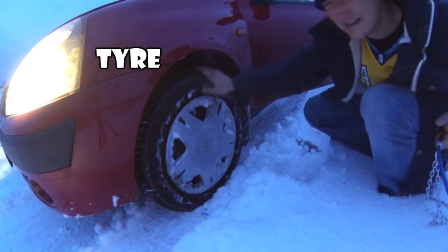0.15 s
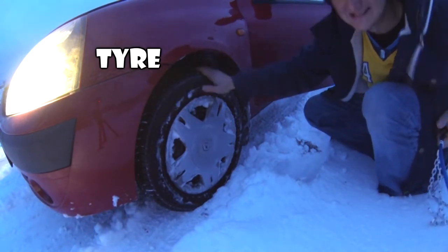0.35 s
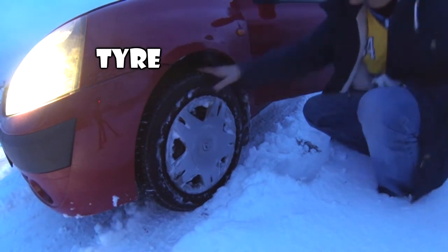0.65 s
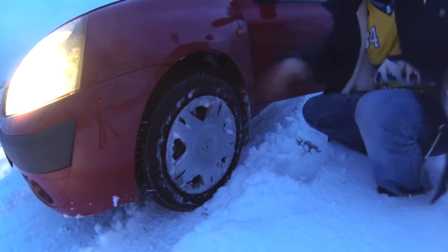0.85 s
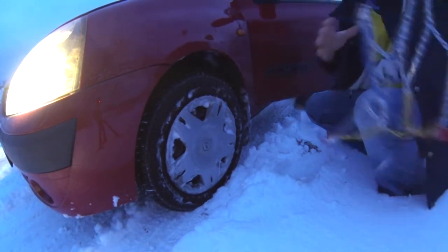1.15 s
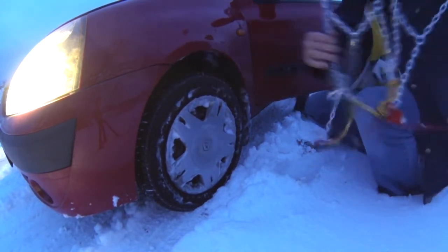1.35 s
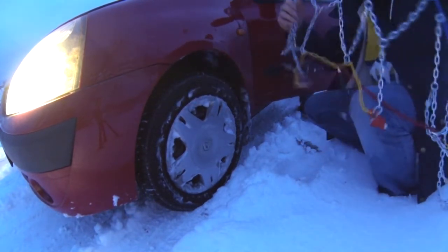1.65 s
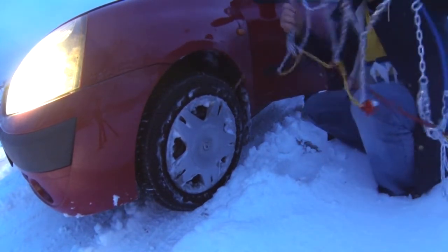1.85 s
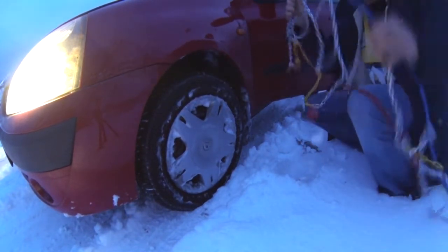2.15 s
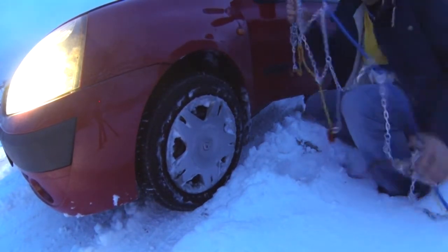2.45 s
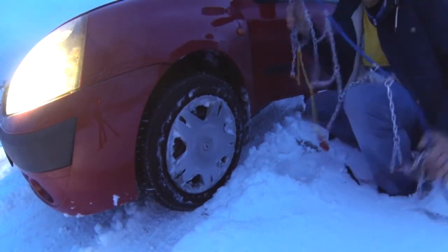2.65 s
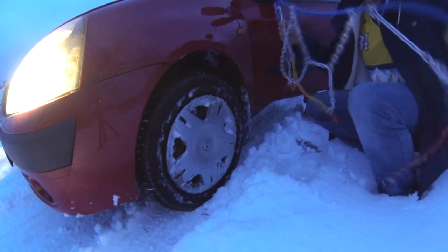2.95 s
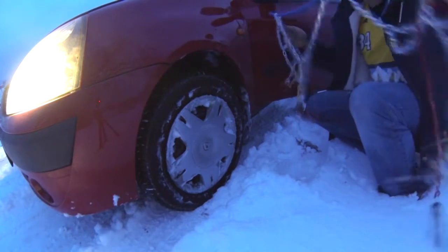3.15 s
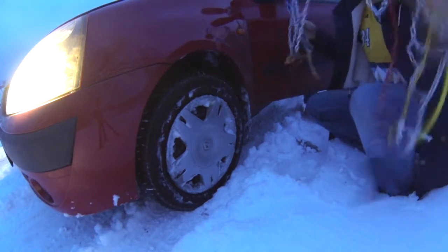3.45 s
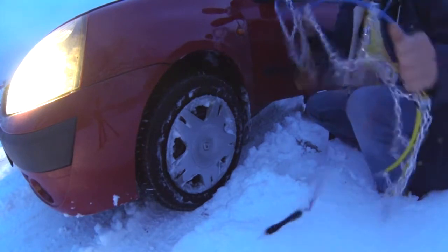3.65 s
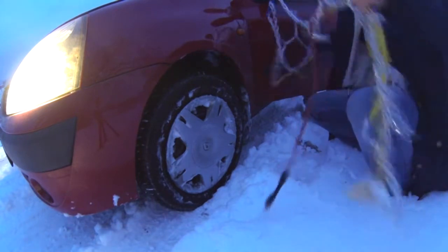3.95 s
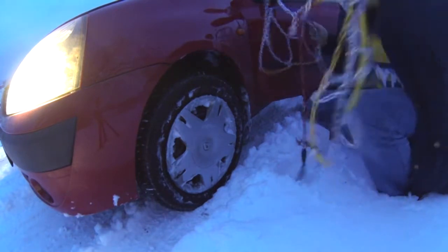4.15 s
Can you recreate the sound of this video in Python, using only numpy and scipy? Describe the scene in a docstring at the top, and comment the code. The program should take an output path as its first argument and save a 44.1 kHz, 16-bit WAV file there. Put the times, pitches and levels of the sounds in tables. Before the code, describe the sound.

Close, echo-free mono sound of someone untangling a metal snow chain in windy open air. Bassy buffeting never stops. After an early clack and a near chain-free second, links tick, clink and slide in uneven pulls, with dull snow and jacket crunches. A piercing snap momentarily pushes the level down, a dense jangle follows, then a hollow knock and sparser slides and ticks.

```python
"""Wind rumbles and buffets a microphone (shaped noise); a small hard clack follows, then single eddies slap.
A steel snow chain is lifted and untangled: snow and jacket cloth crunch, links slide (clumped grains).
Dead contacts tick (short resonated noise); loose links jingle and clink (decaying modes).
One hard clink close by makes the limiter duck everything for a moment."""
import sys
import numpy as np
from scipy import signal
from scipy.fft import rfft, irfft, next_fast_len
from scipy.io import wavfile
from scipy.ndimage import uniform_filter1d, minimum_filter1d, map_coordinates

SR = 44100
rng = np.random.default_rng(int(sys.argv[2]) if len(sys.argv) > 2 else 0)


def log_audio(samples):
    """Write samples as a 16-bit WAV file to the path given in sys.argv[1]."""
    # one column per channel
    frames = np.atleast_2d(samples).T
    # limit to full scale, then quantise
    limited = np.clip(frames, -1, 1)
    pcm = np.round(limited * 32767).astype(np.int16)
    wavfile.write(sys.argv[1], SR, pcm)


N = 190159

# wind strength over time: time_s, rumble_db, buffeting_db
WIND_LEVELS = [(0, -20.5, -17.5), (0.12, -25, -24), (0.23, -15.5, -19.5), (0.29, -19, -19),
               (0.37, -11.5, -17), (0.47, -15.5, -16), (0.62, -19, -21.5), (0.74, -13, -18.5),
               (0.83, -24, -20), (0.96, -17, -17), (1.13, -15.5, -20.5), (1.26, -17.5, -17.5),
               (1.42, -21, -20.5), (1.62, -20, -18), (1.78, -18.5, -21), (1.93, -24, -24),
               (1.99, -16.5, -17.5), (2.09, -18.5, -20.5), (2.2, -19.5, -19), (2.42, -19, -22.5),
               (2.55, -16, -18.5), (2.68, -13.5, -20), (2.87, -14, -20), (3.0, -21.5, -20),
               (3.1, -9, -18.5), (3.21, -17.5, -23), (3.42, -18.5, -17.5), (3.6, -18.5, -23),
               (3.84, -21, -23.5), (3.91, -19, -19.5), (4.08, -20, -20), (4.25, -14.5, -18.5),
               (4.31, -16.5, -23)]
# noise spectra of large eddies, small eddies and air hiss: freq_hz, relative_level_db
RUMBLE_SPECTRUM = [(10, -2), (27, 9), (40, 9), (62, 9.5), (100, 2), (160, -12.5), (300, -42), (900, -110)]
BUFFET_SPECTRUM = [(60, 2.5), (130, 3.5), (200, 2), (320, -5), (500, -11.5), (750, -20.5), (1200, -28.5),
                   (2000, -40), (4000, -47), (9000, -80), (16000, -103)]
AIR_SPECTRUM = [(300, -19), (2000, -19), (4200, -27.5), (8200, -26.5), (11000, -44), (15000, -64)]
# modes of a small hard clack: freq_hz, relative_level_db, t60_s
CLACK_MODES = [(1850, -0.5, 0.026), (2370, 2.5, 0.012), (2600, 7, 0.012), (2910, 1.5, 0.01),
               (4000, -9, 0.007), (5300, 3, 0.0086), (7400, -1, 0.011)]
# modes of two links snapping taut close by: freq_hz, relative_level_db, t60_s
SNAP_MODES = [(3160, -19, 0.01), (4200, -19.5, 0.016), (4700, -7.5, .008), (5000, -20.5, 0.031),
              (8060, -22, 0.013), (8860, 3.5, 0.0069), (9025, 0, 0.031), (9000, -2, 0.0077),
              (9700, -23, .012), (12000, -21, .017)]
# modes of something hollow, struck by the chain's end: freq_hz, relative_level_db, t60_s
KNOCK_MODES = [(1025, 16, 0.012), (1210, 0, 0.017), (1550, -1, 0.009), (1900, 2, 0.0093),
               (2520, -13, 0.0071), (2960, -3, 0.009), (3770, -25, 0.009), (4700, -19, 0.009)]
# single eddies hitting the microphone: start_s, peak_db, t60_s
PUFFS = [(0.154, -15.5, 0.021), (0.221, -9, 0.1), (0.293, -15, .025), (0.438, -12.5, 0.17),
         (0.683, -10.5, 0.075), (0.739, -15, 0.032), (0.794, -9.5, 0.076), (0.847, -11, 0.055),
         (1.0, -12.5, 0.071), (1.034, -14, 0.067), (1.229, -20, 0.14), (1.454, -15.5, 0.051),
         (1.755, -12.5, 0.066), (1.847, -13.5, 0.018), (1.99, -7, 0.11), (2.128, -13.5, 0.052),
         (2.53, -11.5, 0.058), (2.777, -9, .06), (2.89, -10.5, 0.088), (3.0557, -7, 0.044),
         (3.121, -9.5, 0.032), (3.946, -15.5, 0.018), (4.242, -6.5, 0.042)]
# noise spectrum of a slapping eddy: freq_hz, relative_level_db
EDDY_SPECTRUM = [(60, 4.5), (280, 7), (550, -5), (900, -17.5), (1500, -28), (4000, -47), (12000, -90)]
# pulls and shakes of the chain, levels before trims:
# start_s, length_s, crunch_db, sliding_db, jingle_db, shimmer_db
PULLS = [(0.2, 0.23, -60, -72, -80, -85), (0.424, 0.059, -55, -71, -72, -73),
         (0.553, 0.17, -42.5, -52, -52, -66), (0.744, 0.19, -49, -54, -62, -57),
         (0.962, 0.16, -46.5, -57, -58, -52), (1.176, 0.15, -46.5, -57, -51.5, -45),
         (1.3, 0.16, -62, -44.5, -61, -46), (1.5, 0.18, -50, -45.5, -59, -55),
         (1.835, 0.12, -41.5, -42.5, -47.5, -50), (2.065, 0.048, -43, -43.5, -47, -50),
         (2.199, 0.18, -43, -39.5, -38.5, -43), (2.366, 0.043, -42, -49, -45.5, -43),
         (2.497, 0.13, -50, -43.5, -42, -48), (2.705, 0.075, -43, -54, -56, -50),
         (2.865, 0.098, -38.5, -67, -54, -56), (3.066, 0.078, -45, -58, -58, -64),
         (3.212, 0.043, -37, -60, -66, -55), (3.333, 0.415, -41.5, -44, -49, -41),
         (3.464, 0.14, -37, -35.5, -37.5, -36.5), (3.79, 0.16, -50.5, -45, -52, -69),
         (4.11, 0.2, -71, -42.5, -65, -72)]
# spectra of snow and cloth, and of sliding links: freq_hz, relative_level_db
CRUNCH_SPECTRUM = [(300, -21), (1500, -1.5), (2500, -4.5), (4500, -7.5), (6600, -1), (8500, -4),
                   (11000, -11), (15000, -10.5)]
SLIDE_SPECTRUM = [(1500, -24), (4200, -2), (7100, -1.5), (8000, 7), (9000, 7.5), (10200, 0), (11200, -3.5),
                  (13300, 0.5), (15200, -10)]
# dead contacts of taut links and crusted snow, before dulling: start_s, peak_db, centre_hz, t60_s
TICKS = [(0.571, -25, 5400, 0.0078), (0.613, -28, 7000, .008), (0.685, -37, 9000, .007),
         (0.808, -22.5, 9100, 0.011), (0.967, -29, 6800, .015), (0.998, -23, 6200, 0.024),
         (1.073, -12.5, 9800, 0.0071), (1.083, -19, 9500, 0.0089), (1.438, -20, 8200, 0.012),
         (1.479, -23, 8100, 0.0049), (1.634, -24, 7000, 0.024), (1.716, -28.5, 7200, 0.029),
         (1.92, -23, 5160, 0.025), (2.074, -24.5, 6030, .014), (2.188, -23.5, 6270, 0.011),
         (2.222, -19, 8350, 0.014), (2.267, -24, 7500, .008), (2.555, -25, 6500, 0.0087),
         (2.653, -28, 7000, 0.012), (2.796, -23, 4380, 0.017), (2.825, -23.5, 6200, .008),
         (2.857, -21, 5840, 0.017), (2.891, -18, 6100, 0.014), (2.926, -12, 6100, 0.012),
         (2.945, -20, 7000, 0.0065), (2.969, -23.5, 5300, 0.0069), (3.199, -34, 5800, .012),
         (3.253, -18, 5600, 0.014), (3.309, -22.5, 5600, .012), (3.363, -21, 4700, 0.017),
         (3.373, -24, 4000, 0.009), (3.424, -30, 8000, .008), (3.442, -20, 7500, 0.034),
         (3.459, -22, 6640, .008), (3.476, -17, 11000, .02), (3.488, -10.5, 9800, 0.022),
         (3.536, -16, 10200, .012), (3.559, -13, 8850, 0.011), (3.569, -12, 7400, 0.011),
         (3.578, -4, 8700, 0.014), (3.646, -24, 11000, .01), (3.71, -18, 9500, .008),
         (3.7746, -15.5, 8450, 0.029), (3.804, -22, 9400, 0.011), (3.9286, -19, 4150, 0.0078),
         (3.949, -35, 9500, .004), (3.984, -23.5, 9500, 0.042), (4.076, -17, 7750, 0.019),
         (4.123, -30.5, 3150, 0.018), (4.16, -34, 9500, .014), (4.219, -25, 9300, 0.0092),
         (4.233, -24, 9200, 0.0097), (4.244, -30, 8560, 0.0079), (4.265, -33, 4970, 0.028),
         (4.302, -9, 8500, 0.017)]
# ringing modes of the links, scaled by each layer: freq_hz, relative_level_db, t60_s
LINK_MODES = [(4600, -15, 0.032), (4340, 7, 0.18), (4900, -19, 0.028), (4800, 9, 0.064),
              (5800, -14.5, 0.048), (7620, 12, 0.069), (8330, 16, 0.044), (8160, 24, 0.026),
              (8670, 10.5, 0.051), (9030, 4, 0.079), (9800, -6, 0.069), (10230, -2, 0.15), (11700, 5, .04),
              (12400, 15, 0.019), (14010, 1, 0.017), (14290, 6, 0.094), (15000, -10, 0.064),
              (15200, -24, 0.033)]
# modes of links hanging free: freq_hz, relative_level_db, t60_s
FREE_RING_MODES = [(7910, -9, .09), (9035, -6, .09), (10215, -6, .12)]
# highest link modes, kept going by light touches: freq_hz, relative_level_db, t60_s
SHIMMER_MODES = [(14150, 0.5, 0.022), (14700, -10, .015), (14900, -19, 0.023)]
# loose links striking: start_s, peak_db, main_ring_hz, clank_db before trim, share_of_free_ring_time
CLINKS = [(0.584, -38, 14000, -20, 1), (0.664, -28, 4900, 7, 0.83), (0.704, -27, 8300, -24, 1.1),
          (0.7465, -29, 10230, -19, 0.62), (0.747, -25.5, 7890, -20, 1), (1.156, -15.5, 9030, 2.5, 0.94),
          (1.175, -18.5, 9040, 6, 0.61), (1.18, -28, 13960, -20, 1.4), (1.258, -24, 14010, 4, 0.96),
          (1.279, -25, 8960, 2, 0.72), (1.327, -25, 14700, -15, .5), (1.297, -29.5, 9160, 10, 0.99),
          (1.349, -31, 9100, 4, 0.35), (1.385, -32, 8300, 4, 0.8), (1.633, -22.5, 8970, 0, 0.45),
          (1.659, -29, 8160, -22, 0.96), (1.772, -22.5, 7620, 6, 0.99), (1.865, -25.5, 8100, -5, 1.4),
          (1.902, -21, 8160, -9, 0.93), (1.908, -27.5, 12400, -15, 0.8), (1.981, -33, 10230, -7, 0.4),
          (2.096, -21.5, 8670, -13, 0.7), (2.14, -29, 8100, -14, 1.1), (2.267, -24.5, 9800, -10, 0.63),
          (2.298, -20.5, 9200, 2, .5), (2.3068, -24, 9100, -7, 0.26), (2.399, -28, 9070, 2, 0.88),
          (2.468, -32.5, 9040, 0, 0.46), (2.495, -25.5, 9090, -2, 1.1), (2.499, -32, 7900, -19, 0.88),
          (2.525, -36, 9040, -9, 1), (2.556, -33, 14290, -13, 1.2), (2.588, -26, 14400, -15, .8),
          (2.606, -23, 9000, 3, 0.86), (2.731, -26, 10210, -2, 0.28), (2.809, -21, 14290, -24, 0.31),
          (2.865, -23, 9030, 6, 1.8), (2.948, -11, 14290, -35, 0.18), (3.063, -26.5, 9040, 5, 1.2),
          (3.086, -31.5, 9100, -15, 0.64), (3.215, -32.5, 10230, -20, 0.6), (3.359, -33, 14220, -22, .9),
          (3.422, -24, 14300, -20, .8), (3.478, -22, 7830, -8, 0.89), (3.491, -12, 14700, -25, 0.43),
          (3.687, -27, 9100, 9, .4), (3.695, -19, 9030, 4, 0.77), (3.727, -25, 14300, -22, 1),
          (3.89, -36, 10210, -14, 0.74), (3.986, -27, 12400, -18, 0.68), (4.039, -32, 14400, -24, 0.5),
          (4.135, -32, 13200, -23, 0.76), (4.266, -27, 8800, -14, 0.39)]
# modes of links next to a struck one: freq_hz, relative_level_db, t60_s
NEIGHBOUR_MODES = [(3400, -16, 0.052), (4345, -2, 0.035), (4460, -15, 0.016), (4880, -4.5, 0.028),
                   (5180, -19, 0.018), (5600, -14, 0.043)]

PULL_RISE_S, PULL_FALL_S = 0.06, 0.0091  # time constants of the hand's motion
SWING_RISE_S, SWING_FALL_S = 0.0064, 0.033  # hanging links start and settle a little later
CRUNCH_GRAINS_PER_S, SLIDE_GRAINS_PER_S, HISS_SHARE = 1400, 2600, 0.28
LIGHT_TICK_OVER_CRUNCH_DB, LIGHT_TICK_CENTRE_HZ = 10, 7360
LIGHT_TICK_SCATTER_DB, LIGHT_TICK_SPREAD_OCT = 4, 0.4  # standard deviations before clipping
SCRAPE_T60_S = 0.06
CLANK_BELOW_HZ, RATTLE_BELOW_HZ = 6500, 11000
CLANK_DETUNE_SHARE, RATTLE_DETUNE_SHARE = 0.06, 0.04
TOUCHES_PER_S = 170
TOP_HZ = 15300


def amp(db):
    """Decibels to gain."""
    return 10 ** (np.asarray(db) / 20)


def unit(x):
    """x at an rms of 1."""
    return x / np.sqrt(np.mean(x ** 2) + 1e-20)


def noise(count=N):
    """White Gaussian noise."""
    return rng.standard_normal(count)


def curves(rows):
    """One value per sample for each column after the time."""
    time_s, *columns = np.transpose(rows)
    return [np.interp(np.arange(N) / SR, time_s, column) for column in columns]


def wobble(knots_per_s):
    """Smooth random curve."""
    knots = noise(int(N * knots_per_s / SR) + 4)
    return map_coordinates(knots, [np.arange(N) * knots_per_s / SR])


def filtered(x, response):
    """x times a gain given as a function of frequency."""
    size = next_fast_len(N + 8192)
    return irfft(rfft(x, size) * response(np.fft.rfftfreq(size, 1 / SR)), size)[:N]


def coloured(x, spectrum):
    """x shaped by (Hz, dB) points on a log frequency axis, at an rms of 1."""
    points_hz, points_db = np.transpose(spectrum)

    def response(hz):
        return amp(np.interp(np.log(hz + 1), np.log(points_hz), points_db))

    return unit(filtered(x, response))


def fade(t, t60_s):
    """Exponential decay of 60 dB in t60_s."""
    return np.exp(-np.log(1000) * t / t60_s)


def resonate(x, hz, q):
    """x through one resonance."""
    b, a = signal.iirpeak(min(hz, SR / 2 - 1000), max(q, 1), SR)
    return signal.lfilter(b, a, x)


def add(track, start_s, sound, peak_db):
    """Lay a sound into the track with the given peak."""
    room = track[round(start_s * SR):][:len(sound)]
    scaled = amp(peak_db) * sound / np.abs(sound).max()
    room += scaled[:len(room)]


def wind(air_db=-53, air_db_per_buffet_db=0.13):
    """Big eddies rumble on the microphone; small ones flutter above them in quick bursts."""
    rumble_db, buffet_db = curves(WIND_LEVELS)
    rumble = amp(rumble_db) * coloured(noise(), RUMBLE_SPECTRUM)
    slow_db = 1.14 * np.clip(wobble(35), -1.5, 1.5)
    fast_db = 2.4 * np.clip(wobble(160), -2, 2)
    flutter = amp(slow_db + fast_db)
    buffet = amp(buffet_db) * unit(flutter * coloured(noise(), BUFFET_SPECTRUM))
    air_gain_db = air_db + air_db_per_buffet_db * (buffet_db - buffet_db.mean())
    air = amp(air_gain_db) * coloured(noise(), AIR_SPECTRUM)
    return rumble + buffet + air


def struck(modes, rattle_db, rattle_t60_s, crack_db, contact_s=0.00005):
    """A blow and its brief rattle ring a body's modes; the dull crack of the contact is heard too."""
    t = np.arange(SR // 12) / SR
    blow = (t == 0) + amp(rattle_db) * noise(len(t)) * fade(t, rattle_t60_s)
    ring = sum(amp(db) * np.cos(2 * np.pi * hz * t) * fade(t, t60_s) for hz, db, t60_s in modes)
    ring = ring * (1 - np.exp(-t / contact_s))
    body = signal.fftconvolve(blow, ring)[:len(t)]
    crack = resonate(resonate(blow, 2400, 0.7), 2400, 0.7)
    return unit(body) + amp(crack_db) * unit(crack)


def knocks():
    """A clack before the lift, a hard clink as links snap taut, a knock as the chain's end swings down."""
    out = np.zeros(N)
    clack = struck(CLACK_MODES, rattle_db=-23, rattle_t60_s=0.016, crack_db=-7)
    snap = struck(SNAP_MODES, rattle_db=-27, rattle_t60_s=0.004, crack_db=-32, contact_s=0.00025)
    knock = struck(KNOCK_MODES, rattle_db=-15, rattle_t60_s=0.04, crack_db=-10)
    add(out, 0.0648, clack, peak_db=-9)
    add(out, 2.3124, snap, peak_db=17.5)  # far over the limiter's ceiling
    add(out, 3.7747, knock, peak_db=-11.5)
    return out


def puffs(rise_s=0.00091):
    """Single eddies slap the microphone: a quick swell of buffeting that dies away."""
    out, t = np.zeros(N), np.arange(SR // 10) / SR
    air = coloured(noise(), EDDY_SPECTRUM)
    for start_s, peak_db, t60_s in PUFFS:
        piece = np.roll(air, -round(start_s * SR))[:len(t)]
        envelope = (1 - np.exp(-t / rise_s)) * fade(t, t60_s)
        add(out, start_s, piece * envelope, peak_db)
    return out


def handling(rise_s, fall_s):
    """Crunch, sliding, jingle, shimmer in dB: pulls swell, hold and die away; overlaps add in power."""
    t, power = np.arange(N) / SR, np.zeros((4, N))
    for start_s, length_s, *levels_db in PULLS:
        before_s = np.minimum(t - start_s, 0)
        after_s = np.maximum(t - start_s - length_s, 0)
        shape = np.exp(before_s / rise_s - after_s / fall_s)
        power += (amp(levels_db)[:, None] * shape) ** 2
    return 10 * np.log10(power + 1e-12)


def contacts(rate_per_s, spread_db):
    """Random impulses of scattered size and sign."""
    hit = rng.random(N) < rate_per_s / SR
    size = amp(spread_db * np.clip(noise(), -2, 2))
    return hit * size * rng.choice([-1, 1], N)


def grains(spectrum, rate_per_s, clump_db):
    """Tiny clumped contacts over a soft hiss, at an rms of 1."""
    clumping = amp(clump_db * np.clip(wobble(300), -2, 2))
    clicks = unit(contacts(rate_per_s, spread_db=3.5) * clumping)
    return coloured(clicks + HISS_SHARE * noise(), spectrum)


def rustle(crunch_trim_db=-1.87, slide_trim_db=-0.6):
    """Snow and jacket cloth crunch dully; links sliding over each other crackle brightly."""
    crunch_db, sliding_db, *_ = handling(PULL_RISE_S, PULL_FALL_S)
    crunch = grains(CRUNCH_SPECTRUM, CRUNCH_GRAINS_PER_S, clump_db=5)
    sliding = grains(SLIDE_SPECTRUM, SLIDE_GRAINS_PER_S, clump_db=6)
    return amp(crunch_db + crunch_trim_db) * crunch + amp(sliding_db + slide_trim_db) * sliding


def light_ticks(count, t60_s):
    """Lesser contacts at random moments, their peaks following the crunch level."""
    crunch_db, *_ = handling(PULL_RISE_S, PULL_FALL_S)
    rows = []
    for slot in range(count):
        at = int((slot + rng.random()) * (N - 1) / count)
        force, pitch = np.clip(noise(2), -2, 2)
        peak_db = crunch_db[at] + LIGHT_TICK_OVER_CRUNCH_DB + LIGHT_TICK_SCATTER_DB * force
        centre_hz = LIGHT_TICK_CENTRE_HZ * 2 ** (LIGHT_TICK_SPREAD_OCT * pitch)
        rows.append((at / SR, peak_db, centre_hz, t60_s))
    return rows


def ticks(light_t60_s=0.0087, scrape_db=-27, q=1.0, dull_hz=11500, light_count=170):
    """A contact that cannot ring: a short snap of resonated noise and a faint scrape after it."""
    out, t = np.zeros(N), np.arange(SR // 20) / SR
    for start_s, peak_db, centre_hz, t60_s in TICKS + light_ticks(light_count, light_t60_s):
        envelope = fade(t, t60_s) + amp(scrape_db) * fade(t, SCRAPE_T60_S)
        burst = noise(len(t)) * envelope
        add(out, start_s, resonate(resonate(burst, centre_hz, q), centre_hz, q), peak_db)
    return filtered(out, lambda hz: 1 / np.sqrt(1 + (hz / dull_hz) ** 6))


def pings(low_hz, high_hz, level_db, detune_share, ring_share, count, spread_db=8.5):
    """Light random touches, each ringing one mode of one link."""
    out, t = np.zeros(N), np.arange(SR // 25) / SR
    modes = [mode for mode in LINK_MODES if low_hz < mode[0] < high_hz]
    for touch in range(count):
        hz, _, t60_s = modes[int(rng.random() * len(modes))]
        own_hz = hz * (1 + detune_share * rng.standard_normal())
        ring = np.sin(2 * np.pi * own_hz * t) * fade(t, ring_share * t60_s)
        at = int((touch + rng.random()) * (N - 1) / count)
        force_db = spread_db * np.clip(rng.standard_normal(), -2, 1.6)
        add(out, at / SR, ring, level_db[at] + force_db)
    return out


def chatter(modes, level_db, drift_share, swell_db):
    """Quick touches keep each mode ringing; pitch and strength wander as other links take over."""
    out = np.zeros(N)
    for hz, db, t60_s in modes:
        keep = fade(1 / SR, t60_s)  # decay per sample
        swell = amp(swell_db * np.clip(wobble(21), -1.5, 1.5))
        touches = unit(contacts(TOUCHES_PER_S, spread_db=4.5) * swell)
        random_phase = np.exp(2j * np.pi * rng.random(N))
        drive = touches * amp(level_db + db) * random_phase
        swing = signal.lfilter([np.sqrt(2 * (1 - keep ** 2))], [1, -keep], drive)
        cycles = np.cumsum(hz * (1 + drift_share * wobble(9))) / SR
        out += np.real(swing * np.exp(2j * np.pi * cycles))
    return out


def jingle(clank_db=-8, rattle_db=-1, free_db=-4):
    """Hanging links touch as strongly as the chain is shaken: dense rattle with a few steady rings."""
    _, _, jingle_db, shimmer_db = handling(SWING_RISE_S, SWING_FALL_S)
    clanking = pings(0, CLANK_BELOW_HZ, jingle_db + clank_db,
                     CLANK_DETUNE_SHARE, ring_share=0.71, count=600)
    rattling = pings(CLANK_BELOW_HZ, RATTLE_BELOW_HZ, jingle_db + rattle_db,
                     RATTLE_DETUNE_SHARE, ring_share=0.5, count=900)
    singing = chatter(FREE_RING_MODES, jingle_db + free_db, drift_share=0.001, swell_db=5)
    shimmer = chatter(SHIMMER_MODES, shimmer_db, drift_share=0.007, swell_db=3)
    return clanking + rattling + singing + shimmer


def neighbours(t, delay_s=0.0025, count=2):
    """The blow passes down the chain: more links clank in turn, each a little off in pitch."""
    hz, db, t60_s = np.transpose(NEIGHBOUR_MODES)
    out = np.zeros(len(t))
    for link in range(count):
        age_s = np.maximum(t - delay_s * link * (0.5 + rng.random()), 0)
        own_hz = hz * (1 + 0.009 * (link + 1) * noise(len(hz)))
        size = amp(db + 2 * noise(len(hz))) * rng.choice([-1, 1], len(hz)) / np.sqrt(link + 1)
        out += size @ (np.sin(2 * np.pi * own_hz[:, None] * age_s) * fade(age_s, t60_s[:, None]))
    return out


def clinks(focus_db=29, scatter_db=2, neighbour_db=-7.5, crack_db=-12, crack_t60_s=0.0069,
           linger_db=-18, linger_t60_s=0.15, contact_s=0.00015):
    """Each blow rings all the high modes anew; where it lands decides which one stands out."""
    out, t = np.zeros(N), np.arange(SR // 5) / SR
    high_modes = [mode for mode in LINK_MODES if mode[0] > CLANK_BELOW_HZ]
    hz, mode_db, t60_s = np.transpose(high_modes)
    for start_s, peak_db, ring_hz, clank_db, free_share in CLINKS:
        main = np.arange(len(hz)) == np.argmin(np.abs(hz - ring_hz))
        level_db = np.where(main, 0, mode_db + scatter_db * noise(len(hz)) - focus_db)
        # no two links are quite alike
        own_hz = np.where(main, ring_hz, hz * (1 + 0.025 * noise(len(hz))))
        phase = 2 * np.pi * (own_hz[:, None] * t + rng.random((len(hz), 1)))
        decay = fade(t, max(free_share, 0.1) * t60_s[:, None])
        ring = amp(level_db) @ (np.sin(phase) * decay)
        # the struck link swings clear and rings on faintly
        linger = amp(linger_db) * free_share ** 2 * np.sin(phase[main][0]) * fade(t, linger_t60_s)
        crack = amp(crack_db) * resonate(noise(len(t)), 5600, 0.53) * fade(t, crack_t60_s)
        clank = amp(clank_db + neighbour_db) * neighbours(t)
        onset = 1 - np.exp(-t / contact_s)
        add(out, start_s, (ring + linger + crack + clank) * onset, peak_db)
    return out


def scene():
    """Open air over snow gives no echo: the sources simply add."""
    chain = knocks() + rustle() + ticks() + jingle() + clinks()
    return (wind() + puffs() + chain)[None]


def limiter(x, ceiling_db=-1, release_db_per_s=165, window_samples=45):
    """Gain drops at once under a peak and climbs back at a steady rate, lightly smoothed."""
    climb_db = release_db_per_s * np.arange(N) / SR
    needed_db = np.minimum(0, ceiling_db - 20 * np.log10(np.abs(x) + 1e-9))
    held_db = minimum_filter1d(needed_db, size=window_samples)
    gain_db = np.minimum.accumulate(held_db - climb_db) + climb_db
    return x * amp(uniform_filter1d(gain_db, size=window_samples))


def record(dry):
    """Peaks are limited, then a very steep low-pass removes what lies above TOP_HZ."""
    limited = limiter(dry[0])
    return filtered(limited, lambda hz: 1 / np.sqrt(1 + (hz / TOP_HZ) ** 160))[None]


dry = scene()
out = record(dry)
log_audio(out)
```